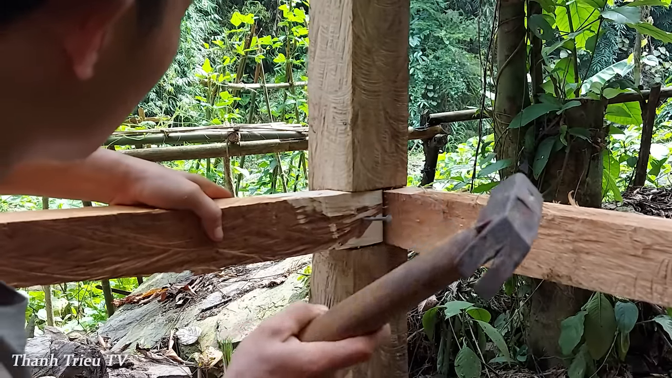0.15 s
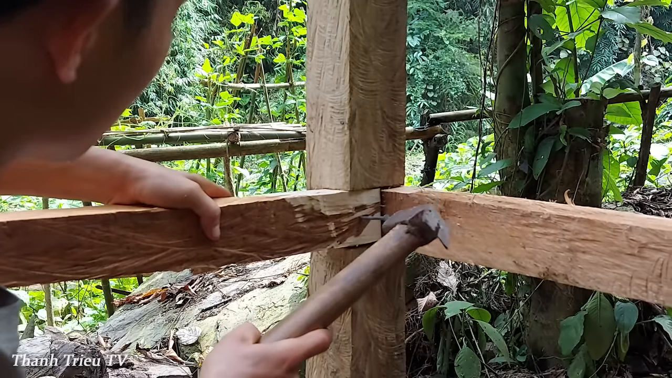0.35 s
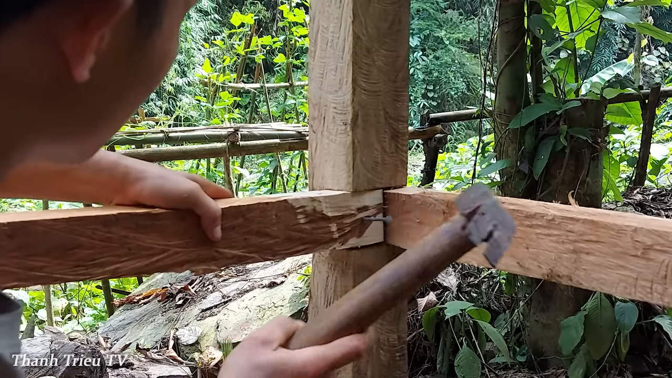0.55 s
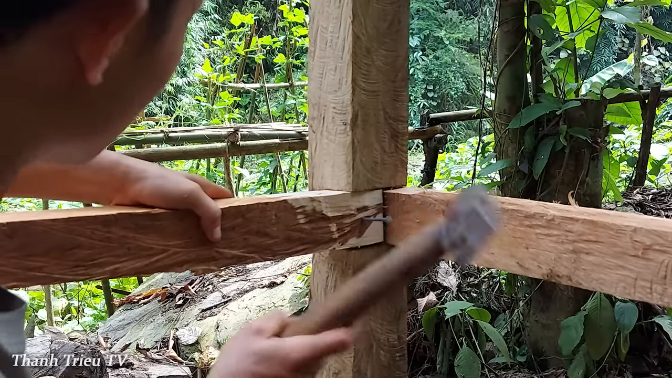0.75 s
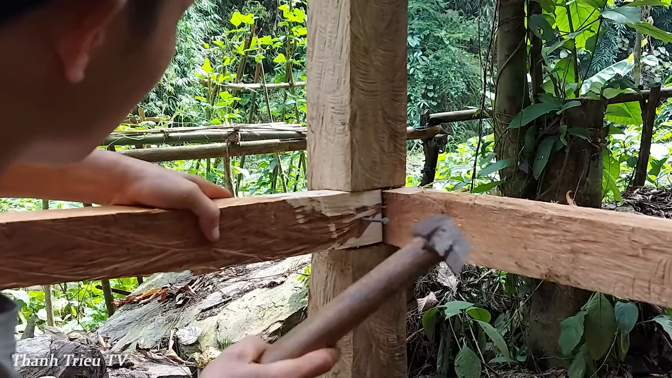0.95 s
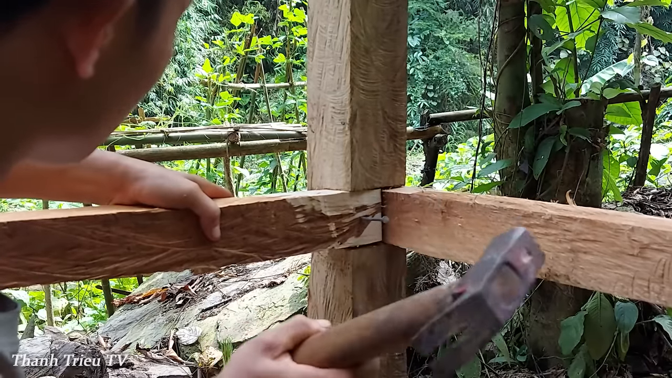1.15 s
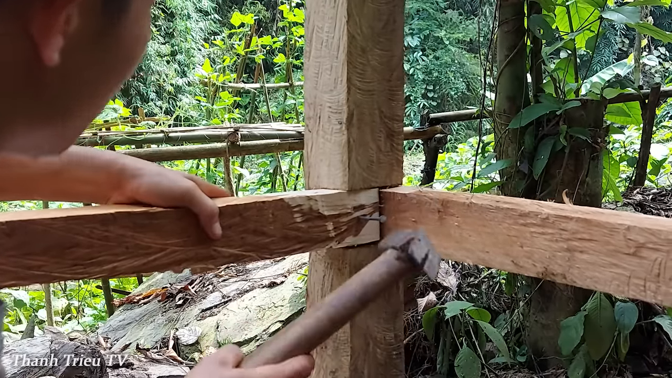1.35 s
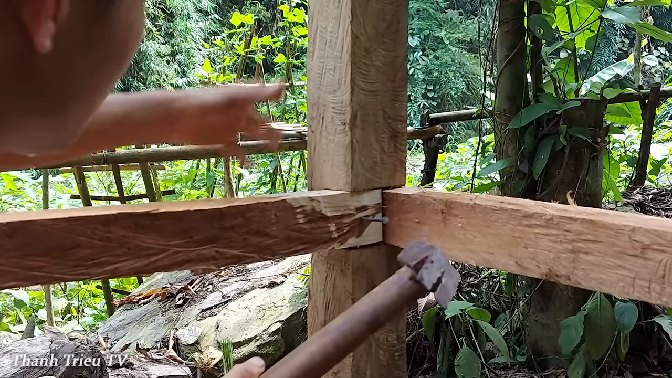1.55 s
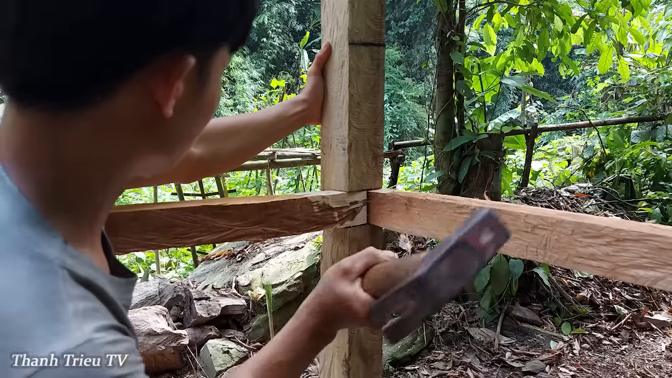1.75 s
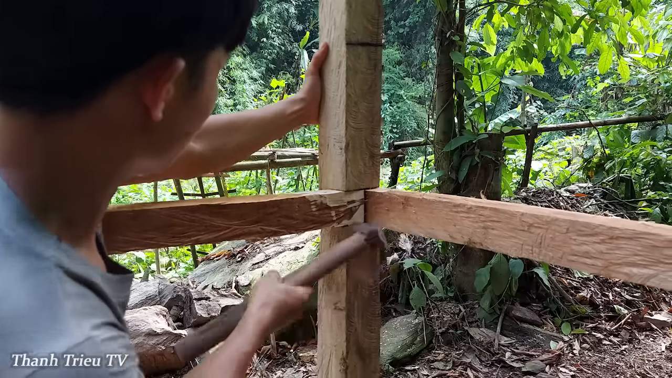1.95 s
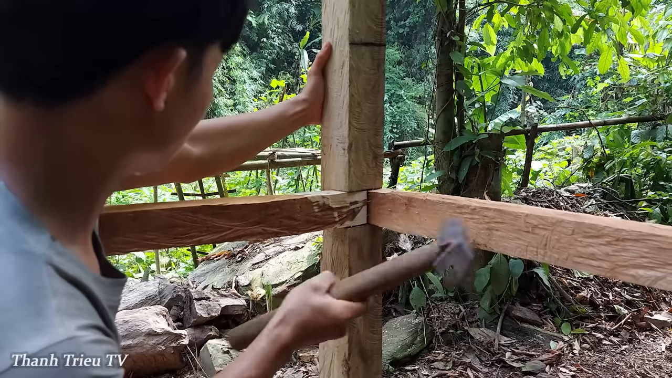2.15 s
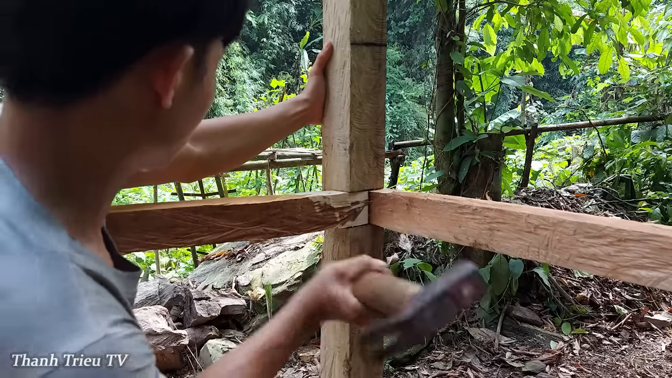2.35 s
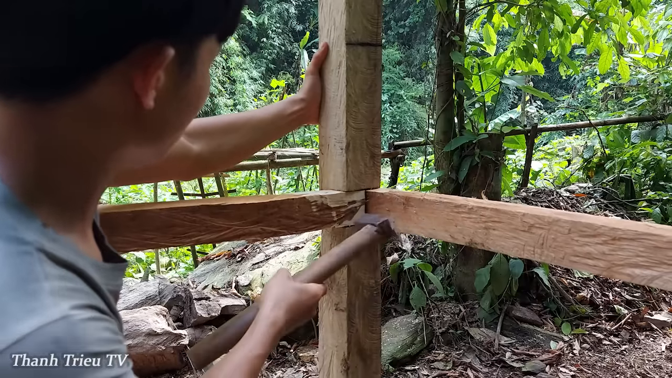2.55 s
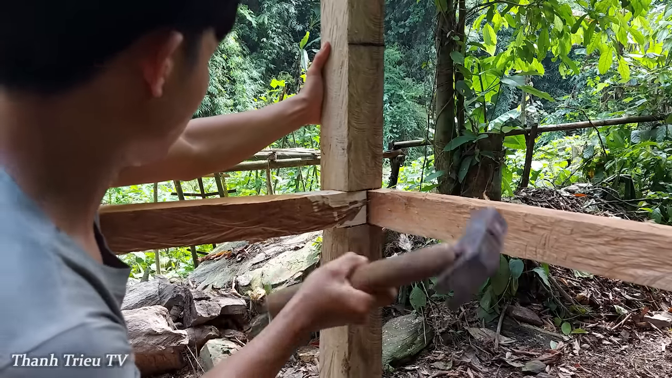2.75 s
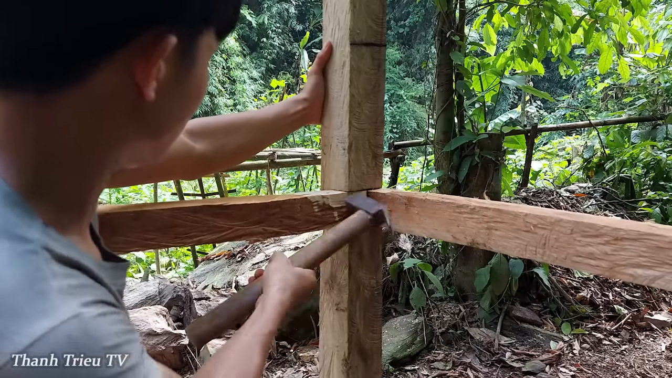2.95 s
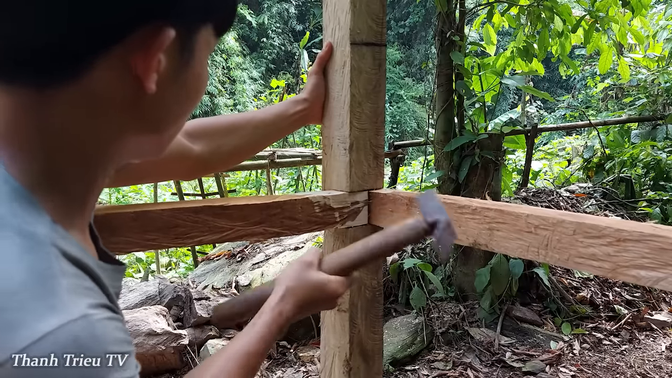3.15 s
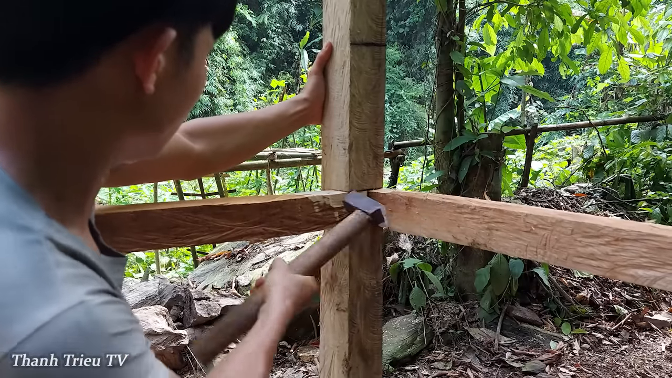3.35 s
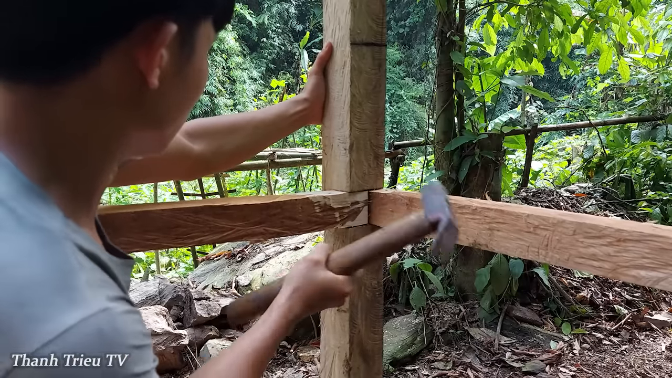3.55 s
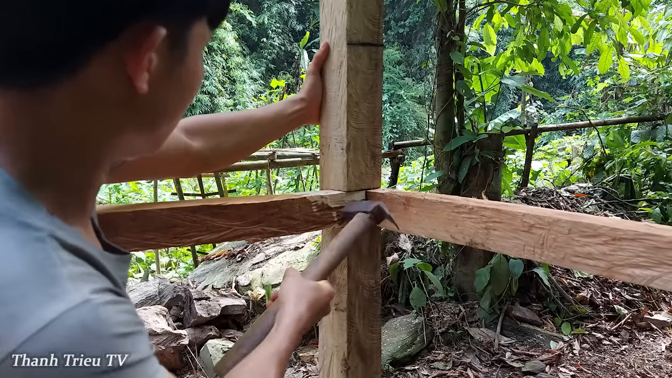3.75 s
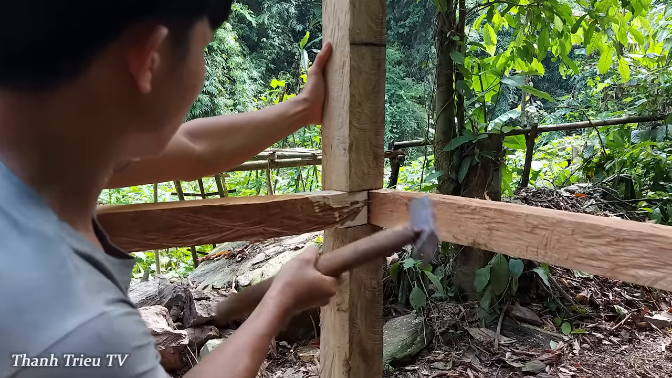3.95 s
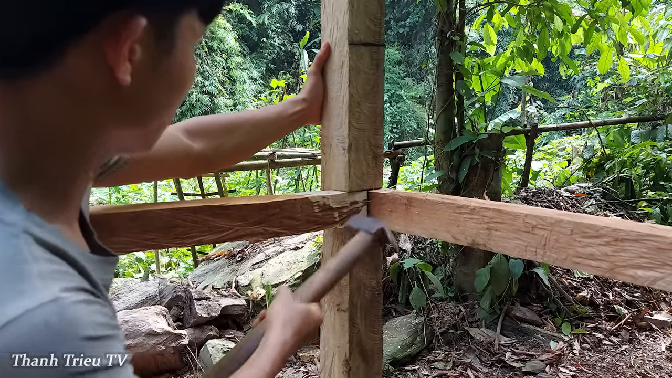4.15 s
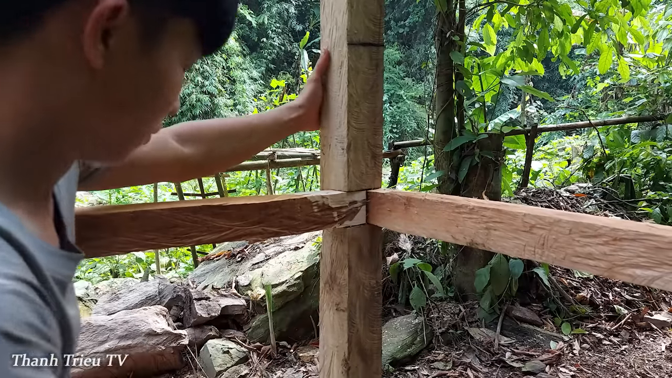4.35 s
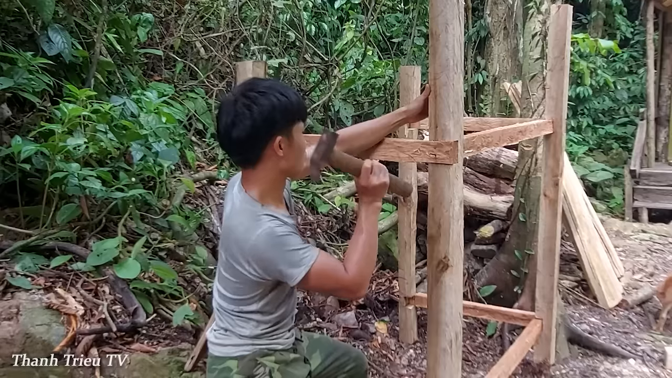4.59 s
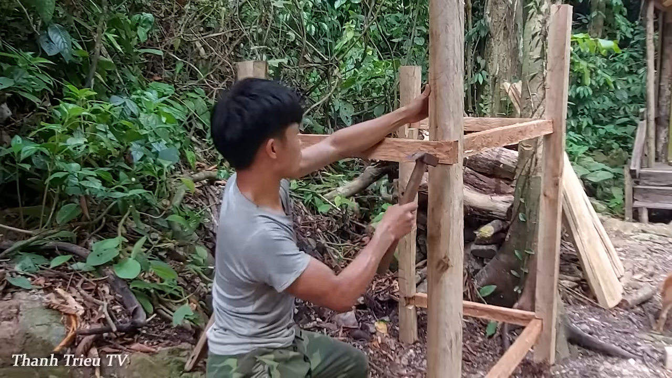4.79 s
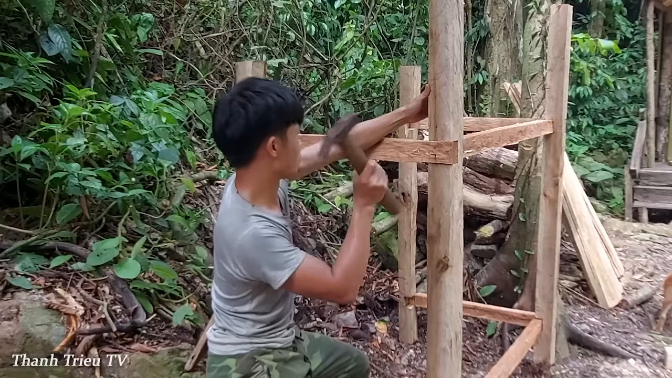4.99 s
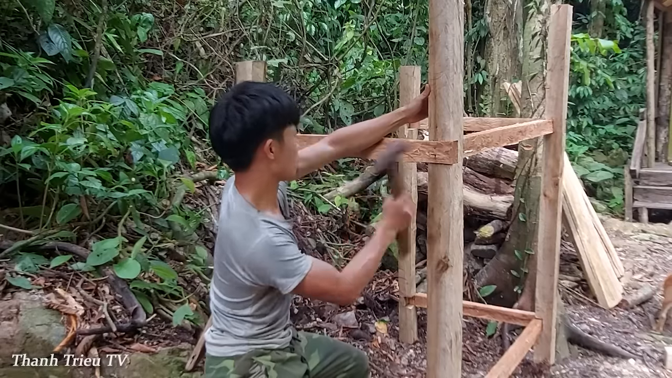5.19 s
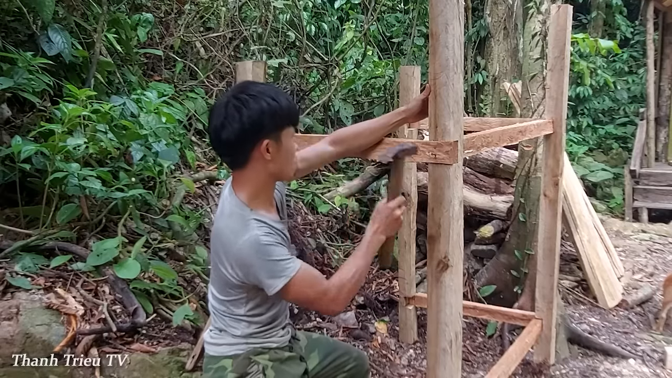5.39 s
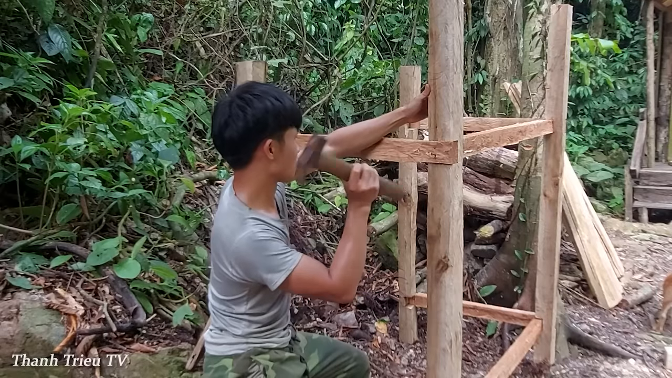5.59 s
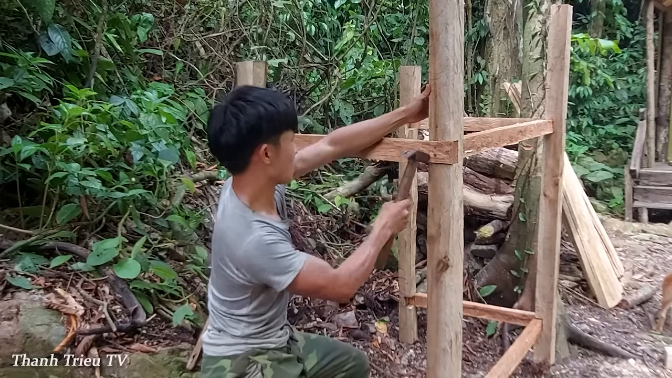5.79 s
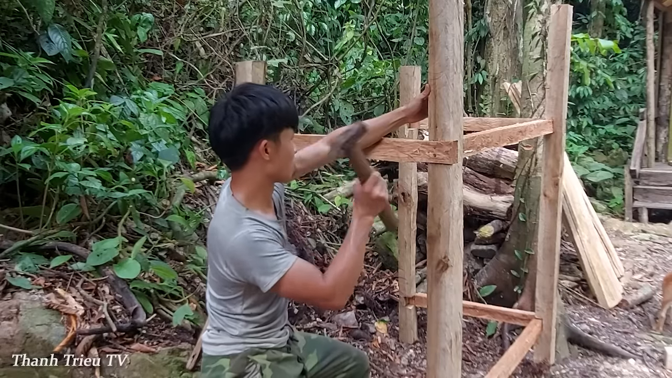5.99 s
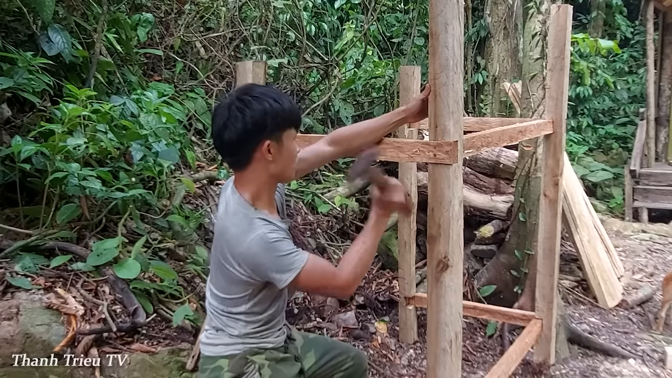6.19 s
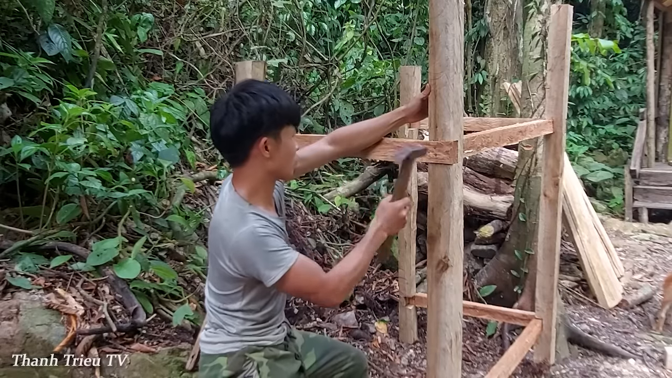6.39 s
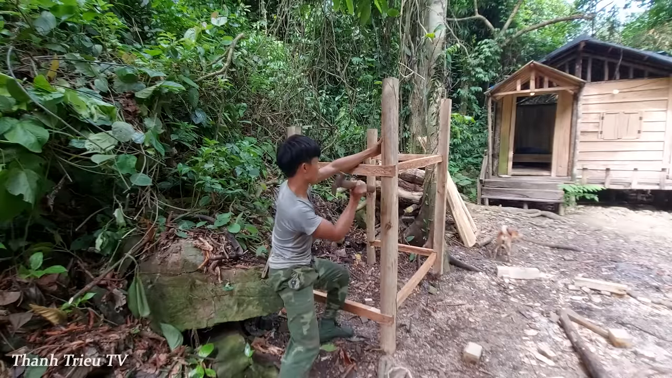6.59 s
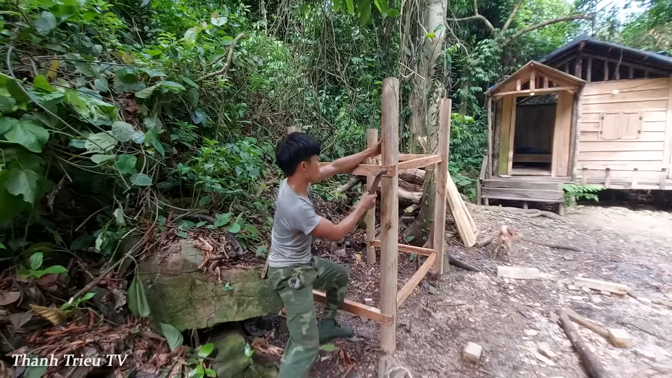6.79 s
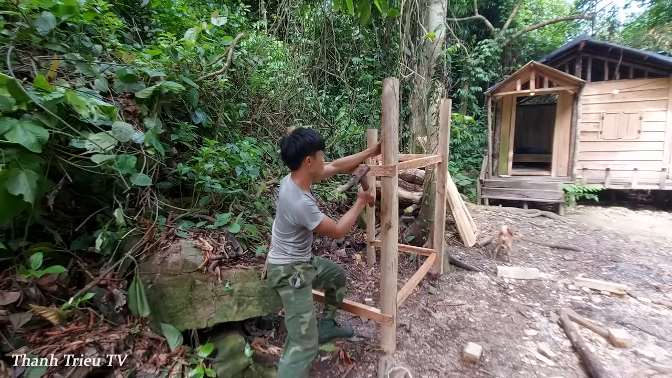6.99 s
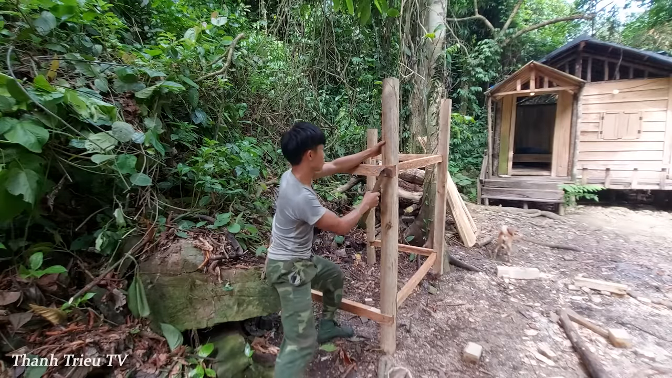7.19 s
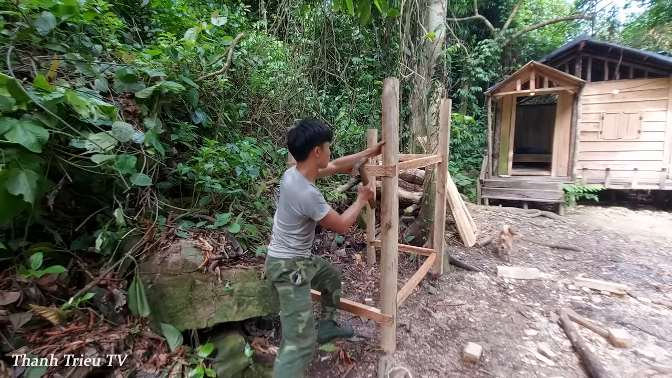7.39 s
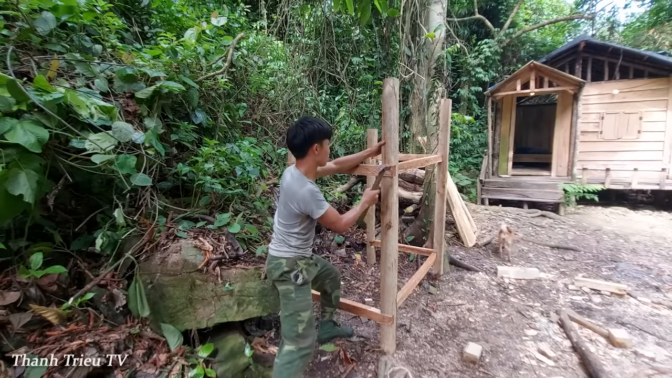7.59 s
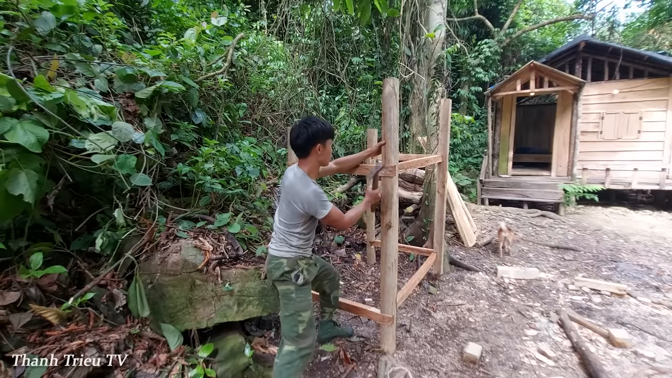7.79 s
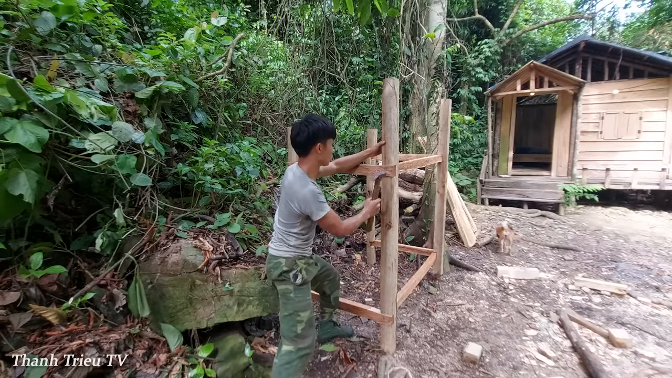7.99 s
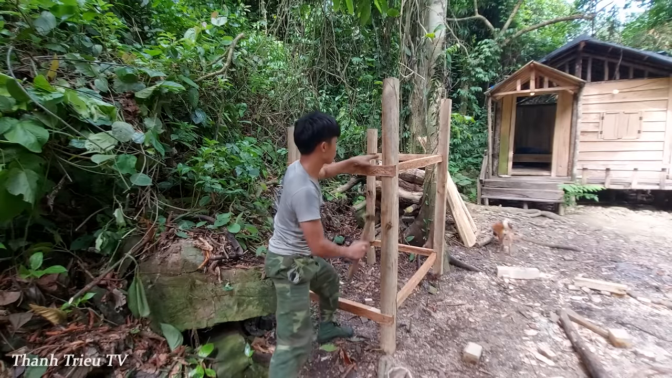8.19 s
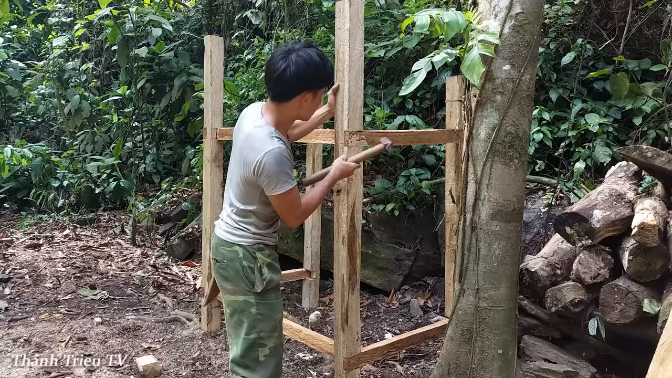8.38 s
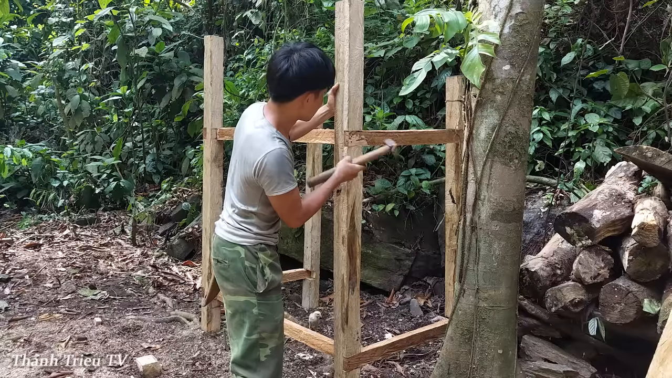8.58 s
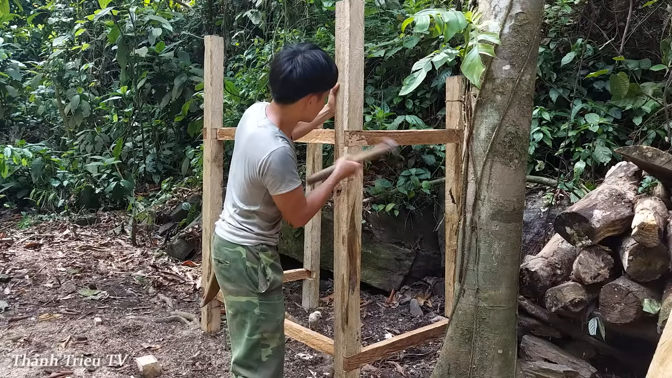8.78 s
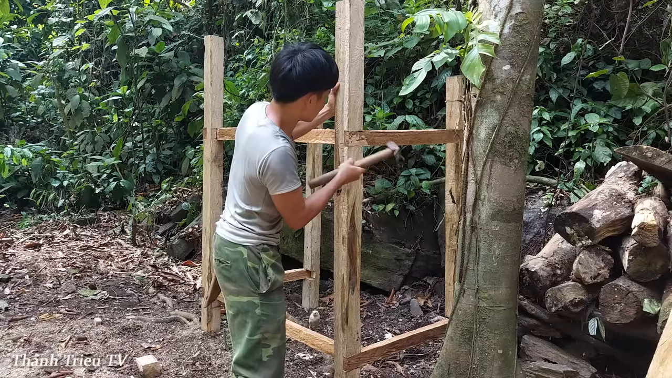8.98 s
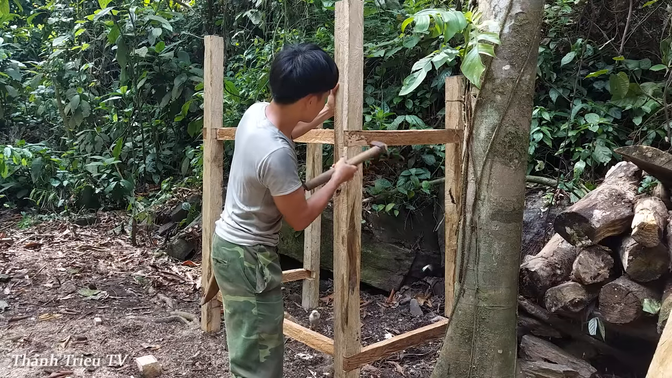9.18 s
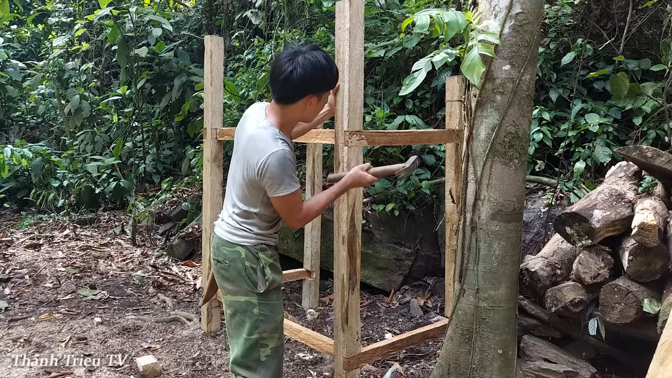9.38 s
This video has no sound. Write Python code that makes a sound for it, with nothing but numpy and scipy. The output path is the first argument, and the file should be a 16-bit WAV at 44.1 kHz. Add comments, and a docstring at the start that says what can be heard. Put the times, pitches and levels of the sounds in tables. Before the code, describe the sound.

About twenty hammer blows on wooden beams, each a sharp contact and short hollow ring that dies quickly, with a soft scattering from trees. The tone jumps whenever the listening spot changes. Some blows puff low air into the nearby microphone. Two dull rebounds, small scuffs and one faint falling bird whistle slip between; quiet leaf hush continues throughout.

```python
"""Hammering a timber frame in a forest

A heavy hammer drives the joints of a timber frame home in a forest clearing, heard from six spots in turn.
Each blow is a noise crack plus damped beam modes, with a far echo and a diffuse wash from the trees.
Some blows push a puff of air into the microphone: a short, deep damped swing. Light scuffs are noise bands.
Filtered noise makes the hush and the insects, a falling sine the bird. The blows overload the recorder.
"""
import sys
import numpy as np
from scipy import signal
from scipy.fft import rfft, irfft, next_fast_len
from scipy.io import wavfile

SR = 44100
rng = np.random.default_rng(int(sys.argv[2]) if len(sys.argv) > 2 else 0)


def inscribe(sig):
    """Save sig as 16-bit PCM at rate SR to the path in sys.argv[1].

    A 1-D sig is mono; a 2-D sig holds one channel per row.
    Samples are clipped to [-1, 1] before scaling.
    """
    pcm = np.round(np.clip(np.atleast_2d(sig).T, -1, 1) * 32767)
    wavfile.write(sys.argv[1], SR, pcm.astype(np.int16))


N = 416304

# Blows; the first fell before time zero and is dying away:
# (time [s], force [dB], hardness of the contact as treble gain [dB])
BLOWS = [(-.1, 26, 9), (0.3891, 28, 8.5), (.874, 31, 5), (1.341, 32.5, 1.5), (1.955, 26, -1),
         (2.5021, 28, -4), (2.9983, 37.5, -3), (3.3933, 37, -13.5), (3.7434, 34, -0.5), (4.064, 37, -6.5),
         (4.7124, 30, 0.5), (5.2241, 30.5, -1), (5.745, 27, 5.5), (6.2776, 35, 8), (6.7346, 38, 0.5),
         (7.133, 35, 2.5), (7.4976, 36, -2), (7.8344, 36, -1.5), (8.5, 26, -10), (8.8617, 30, 3.5),
         (9.1803, 31, -7.5)]
# The head drops back on the wood, dull, the first nearly as strong as its blow: (time [s], force [dB])
REBOUNDS = [(4.752, 28.5), (8.905, 19)]
# Listening spots: (start [s], ring length [factor], crack [dB], clear modes [dB], echo [dB], bass [dB],
# bite [dB], forest wash [dB], left-right difference [dB])
SPOTS = [(0, 1.26, 3.5, 0, -30.5, -1.5, 3.5, -20.5, 2.5), (1.68, 1.28, 7.5, 1, -25.5, -7.5, 6.5, -14.5, 1),
         (2.8, 0.92, 5.5, -2, -21.5, -6, 1.5, -12.5, 3), (4.57, 1.21, -4, -0.5, -28, -2.5, 1.9, -14.7, 1),
         (6.2, 0.95, -5, -2.5, -38, 0, -0.2, -14.5, .5), (8.33, 0.94, -5, -0.5, -51, 1, 6.5, -14.5, -.5)]
# Clear modes of the struck joint at each spot, timber below and steel hammer head on top:
# (frequency [Hz], relative level [dB], t60 before stretching [s])
JOINT_MODES_1 = [(160, -5.7, 0.198), (241, -2.9, 0.18), (313, 1.9, 0.136), (386, 4.8, 0.111),
                 (467, 0.4, 0.104), (583, 5.2, 0.18), (637, 6.8, 0.098), (704, 2.0, 0.116),
                 (896, 4.5, 0.093), (1017, 4.8, 0.163), (1115, 2.0, 0.117), (1392, 7.0, 0.102),
                 (1773, 4.3, 0.093), (2191, -2.0, 0.123), (6639, -14.6, 0.112), (9728, -6.0, 0.15),
                 (10065, -7.8, 0.18), (10739, -0.6, 0.15)]
JOINT_MODES_2 = [(263, 7.0, 0.18), (511, 4.5, 0.18), (721, 5.7, 0.162), (753, 4.9, 0.18), (963, 3.2, 0.172),
                 (1146, 3.2, 0.176), (1336, 3.6, 0.119), (1668, 2.3, 0.143), (2444, -0.8, 0.175),
                 (3266, -0.2, 0.144), (4021, -0.3, 0.144), (9149, -1.4, 0.165), (9761, 5.3, 0.15)]
JOINT_MODES_3 = [(267, -2.1, 0.18), (532, -1.8, 0.176), (725, 1.4, 0.18), (832, 2.2, 0.123),
                 (960, 5.0, 0.159), (1138, 4.2, 0.117), (1206, -0.0, 0.165), (1341, 2.4, 0.113),
                 (1435, 3.4, 0.119), (1537, 0.3, 0.14), (1866, 2.2, 0.18), (2075, -2.4, 0.155),
                 (2444, -2.7, 0.18), (2830, -5.8, 0.146), (3266, -7.5, 0.148), (9761, -8.9, 0.18)]
JOINT_MODES_4 = [(138, 7.7, 0.38), (706, 1.8, 0.18), (782, 3.7, 0.18), (1042, 3.9, 0.18), (1123, 1.5, 0.18),
                 (1480, 7.9, 0.18), (1696, 4.0, 0.141), (1822, 3.0, 0.172), (1971, 1.8, 0.18),
                 (2362, -0.4, 0.18), (5019, -2.0, 0.155), (8842, -0.5, 0.137), (9180, 2.8, 0.154),
                 (9795, 3.2, 0.134), (11776, -0.8, 0.18)]
JOINT_MODES_5 = [(136, 3.7, 0.45), (273, -4.6, 0.18), (461, -2.5, 0.18), (585, -0.4, 0.144),
                 (687, 3.6, 0.142), (735, 2.5, 0.18), (790, 1.4, 0.165), (927, 4.3, 0.142),
                 (1045, 3.3, 0.113), (1300, 3.6, 0.18), (1480, 2.9, 0.155), (1590, 1.3, 0.125),
                 (1731, 2.2, 0.145), (1931, -2.4, 0.163), (2306, -3.0, 0.14), (4132, -9.8, 0.18),
                 (9795, -11.6, 0.139)]
JOINT_MODES_6 = [(138, 5.3, 0.55), (187, -0.4, 0.4), (305, 5.9, 0.12), (332, 6.8, 0.12), (453, 4.7, 0.18),
                 (593, 4.6, 0.18), (685, 0.2, 0.18), (912, 1.4, 0.18), (1206, 6.3, 0.135),
                 (1354, 5.8, 0.139), (1911, 4.3, 0.113), (2039, 0.9, 0.18), (3156, -4.5, 0.142),
                 (3730, -4.7, 0.123), (4818, -5.7, 0.14)]
# The many weaker, close-set modes of each joint, as a spectrum: (frequency [Hz], relative level [dB])
DENSE_MODES_1 = [(50, -10), (100, -5.5), (200, -6.5), (290, 2), (400, 1), (700, 1), (1300, -2), (2000, -4),
                 (3200, -13.5), (5000, -24), (7500, -25.5), (10000, -16.5), (15500, -21.5)]
DENSE_MODES_2 = [(50, 11.5), (100, 4), (200, 2), (290, 17), (400, 6), (700, 3.5), (1300, 2.5), (2000, 2),
                 (3200, -2.5), (5000, -8.5), (7500, -11), (10000, 1.5), (15500, -13)]
DENSE_MODES_3 = [(50, -8), (100, -9), (200, -11.5), (290, 3), (400, -4), (700, -1.2), (1300, 0),
                 (2000, -0.5), (3200, -12), (5000, -19.5), (7500, -25), (10000, -10.5), (15500, -25)]
DENSE_MODES_4 = [(50, -3.5), (100, 1.5), (200, -9), (290, -3), (400, -6.5), (700, -8), (1300, 1),
                 (2000, -1), (3200, -8), (5000, -5.5), (7500, -10), (10000, -3.5), (15500, -12.5)]
DENSE_MODES_5 = [(50, -13), (100, -12), (200, -13), (290, -5.5), (400, -9.5), (700, 0), (1300, 1.5),
                 (2000, -2.5), (3200, -11), (5000, -16), (7500, -23), (10000, -15.5), (15500, -24.5)]
DENSE_MODES_6 = [(50, -10), (100, -7.5), (200, -17), (290, 5), (400, -1), (700, -1), (1300, 5), (2000, 1.1),
                 (3200, -5.5), (5000, -11), (7500, -12.5), (10000, -10), (15500, -18.5)]
# The joint at each spot: (clear modes, dense modes)
JOINTS = [(JOINT_MODES_1, DENSE_MODES_1), (JOINT_MODES_2, DENSE_MODES_2), (JOINT_MODES_3, DENSE_MODES_3),
          (JOINT_MODES_4, DENSE_MODES_4), (JOINT_MODES_5, DENSE_MODES_5), (JOINT_MODES_6, DENSE_MODES_6)]
# Decay of the dense ring: (frequency [Hz], t60 before the spot and damping factors [s])
RING_T60 = [(60, 0.39), (300, 0.14), (1200, 0.063), (4000, 0.094), (11000, 0.18)]
# First contact relative to the ring: (frequency [Hz], level before the spot's crack gain [dB])
CRACK_COLOUR = [(150, -15), (700, -14.5), (2000, -1), (11000, 4.5)]
# Decay of the sound scattered by the forest: (frequency [Hz], t60 [s])
FOREST_T60 = [(100, 0.44), (400, 0.89), (1300, 0.8), (3000, 0.54), (6000, 0.59), (13000, 0.59)]
# Colour of the scattered sound: (frequency [Hz], relative level [dB])
FOREST_COLOUR = [(60, 1), (300, -3), (1200, -0.5), (4000, 5), (11000, 0)]
# Left-right correlation of the near, direct sound: (frequency [Hz], correlation [-1 to 1])
NEAR_CORRELATION = [(100, 0.99), (380, 0.95), (700, 0.45), (1300, 0.25), (4000, 0.29), (9000, 0.043)]
# Left-right correlation of the diffuse, far sound: (frequency [Hz], correlation [-1 to 1])
FAR_CORRELATION = [(100, 0.81), (290, 0.76), (640, 0.28), (1400, -0.26), (3000, 0.12), (9000, -0.079)]
# Puffs of air from the swing: (time [s], left level [dB], right level [dB])
PUFFS = [(1.957, -9.5, -1), (2.503, -18, 9), (2.997, -34, -26), (3.746, -16, -10), (4.066, -8.5, -23),
         (5.227, 5.5, -28)]
# Handling of wood and tool: (time [s], level [dB], centre [Hz], width [octaves], t60 [s])
SCUFFS = [(6.104, -37.5, 3400, 0.23, 0.063), (6.151, -31.5, 1320, 0.87, 0.069),
          (6.149, -36.5, 9000, .8, 0.1), (8.346, -37.5, 1200, 1.43, 0.63), (9.403, -40, 11000, .4, 0.07)]
# Forest air by place: (start [s], hush level [dB], treble tilt [dB], insect centre [Hz],
# insect level [dB], insect band width [octaves])
AIR = [(0, -47.5, -5, 8330, -65, .045), (1.68, -50.5, -6, 7720, -72.5, .055),
       (4.573, -46.5, -4.5, 7560, -60, 0.058), (8.33, -44, -5, 7700, -60, 0.092)]
# Spectrum of the hush before levelling: (frequency [Hz], relative level [dB])
HUSH_COLOUR = [(18, -74), (30, -36), (75, -10), (194, -8), (266, -10), (303, -4), (600, -5), (913, -5.5),
               (988, -8.5), (1390, -6), (2290, -7.5), (11700, -14), (16000, -20)]
# Centres of the bands that decay separately: (frequency [Hz])
BANDS_HZ = [60, 150, 350, 800, 1700, 3500, 7000, 14000]

# Contact and trees, all in dB per dB: a harder blow has more knock and bite, a stronger one more bite,
# and a harder one carries better into the trees
KNOCK_PER_HARDNESS, WASH_PER_HARDNESS = 0.12, 0.19
BITE_PER_HARDNESS, BITE_PER_FORCE = 0.47, 0.6
USUAL_FORCE_DB = 35
SUB_BASS_DB = -18  # relative to the bass: the beams radiate little of the lowest bass
CRACK_T60_S, CRACK_RISE_S = 0.014, 0.0003
ECHO_S = 0.132
# the resting head shortens the ring (a factor) and hardly changes the bass
REBOUND_HARDNESS_DB, REBOUND_RING, REBOUND_BASS_DB = -32, 0.63, -0.5
BIRD_AT_S, BIRD_LENGTH_S = 2.862, 0.098
BIRD_START_HZ, BIRD_START_DB = 3590, -59
BIRD_SAG_HZ_PER_S, BIRD_FADE_DB_PER_S = 4200, 70
EDGE_HZ = 16000  # low-pass edge of the finished sound


def gain_of(db):
    """Level to amplitude ratio: 20 dB is a factor of ten."""
    return 10 ** (np.asarray(db) / 20)


def evened(x):
    """Power normalisation: scales to rms 1."""
    return x / np.sqrt(np.mean(x ** 2) + 1e-20)


def read(points, hz):
    """Logarithmic pitch scale: joins (Hz, value) points by straight lines over log frequency."""
    f, value = np.transpose(points)
    return np.interp(np.log(hz + 1), np.log(f + 1), value)


def add(mix, s, sound):
    """Superposition: adds a stereo sound at time s, which may lie before time zero."""
    start = round(s * SR)
    sound = sound[:, max(-start, 0):]
    part = mix[:, max(start, 0):][:, :sound.shape[1]]
    part += sound[:, :part.shape[1]]


def bins(x):
    """Discrete Fourier analysis: the frequencies of the spectrum of x."""
    return np.fft.rfftfreq(x.shape[-1], 1 / SR)


def coloured(x, db):
    """Minimum-phase filtering: a causal filter with the given gain per bin keeps attacks sharp."""
    size = x.shape[-1]
    cepstrum = irfft(np.log(gain_of(np.maximum(db, -100))), size)
    # folding the cepstrum onto positive time makes the filter causal
    cepstrum[1:size // 2] *= 2
    cepstrum[size // 2 + 1:] = 0
    return irfft(rfft(x) * np.exp(rfft(cepstrum)), size)


def noise_pair(size, correlation):
    """Spatial correlation: white noise at two microphone ports, sharing a part set by frequency."""
    left, other = rng.standard_normal((2, size))
    same = np.clip(read(correlation, bins(left)), -1, 1)
    right_spectrum = same * rfft(left) + np.sqrt(1 - same ** 2) * rfft(other)
    return np.array([left, irfft(right_spectrum, size)])


def noise_band(size, hz, octaves):
    """Band-limited noise: a bell-shaped band on an octave axis, rms 1."""
    x = noise_pair(size, FAR_CORRELATION)
    distance = np.log2((bins(x) + 1) / hz) / octaves
    return evened(irfft(rfft(x) * np.exp(-distance ** 2), size))


def fade(size, t60, rise=0.0012):
    """Exponential damping: a quick rise and a fall of 60 dB per t60, energy 1."""
    t = np.arange(size) / SR
    shape = gain_of(-60 * t / t60) * (1 - np.exp(-t / rise))
    return shape / np.linalg.norm(shape)


def dying(x, t60s, rise):
    """Frequency-dependent damping: each band of a noise dies at its own speed."""
    size, spectrum = x.shape[-1], rfft(x)
    out = np.zeros_like(x)
    for one_band, t60 in zip(np.eye(len(BANDS_HZ)), t60s):
        share = read(list(zip(BANDS_HZ, one_band)), bins(x))
        out += irfft(spectrum * share, size) * fade(size, t60, rise)
    return out


def hammering():
    """Impact excitation: gives each blow and rebound to the joint of its spot."""
    free = [(s, db, hardness_db, 1, 0) for s, db, hardness_db in BLOWS]
    damped = [(s, db, REBOUND_HARDNESS_DB, REBOUND_RING, REBOUND_BASS_DB) for s, db in REBOUNDS]
    hits = np.array(free + damped)
    where = np.searchsorted([spot[0] for spot in SPOTS[1:]], hits[:, 0])
    return sum(joint(hits[where == k], spot, *JOINTS[k]) for k, spot in enumerate(SPOTS))


def joint(hits, spot, modes, dense_modes, fresh=0.31, dense_db=-1.0, tail_modes_db=-4, echo_hz=560):
    """Modal superposition and scattering: crack, ringing beams, a far echo and a wash from the trees."""
    _, length, crack_db, modes_db, echo_db, bass_db, bite_db, wash_db, pan_db = spot
    out, bands = np.zeros((2, N)), np.array(BANDS_HZ)
    grain = noise_pair(SR, NEAR_CORRELATION)  # the same timber answers every blow
    hz = bins(grain)
    dense_colour_db = read(dense_modes, hz)
    # the phase between the ports follows from their correlation
    apart = np.arccos(np.clip(read(NEAR_CORRELATION, np.array(modes)[:, 0]), -1, 1))
    phases = rng.uniform(0, 2 * np.pi, (len(modes), 1)) + np.outer(apart, [1, 0])
    crack_gain_db = read(CRACK_COLOUR, hz) + crack_db
    share_db = -10 * np.log10(1 + gain_of(crack_gain_db) ** 2)  # crack and ring share the energy
    echo_band = signal.butter(2, [echo_hz / 2, echo_hz * np.sqrt(2)], "band", fs=SR, output="sos")
    pan = gain_of([[pan_db / 2], [-pan_db / 2]])
    for s, force_db, hardness_db, damping, rebound_bass_db in hits:
        texture = np.sqrt(1 - fresh) * grain + np.sqrt(fresh) * noise_pair(SR, NEAR_CORRELATION)
        ring = dying(texture, damping * length * read(RING_T60, bands), rise=0.00078)
        burst = noise_pair(SR, NEAR_CORRELATION) * fade(SR, CRACK_T60_S, rise=CRACK_RISE_S)
        crack = coloured(burst, crack_gain_db)
        clear = gain_of(modes_db) * ringing(modes, phases, stretch=0.91 * damping)
        knock = clear + coloured(ring + crack, dense_colour_db + share_db + dense_db)
        # trunks and leaves scatter the knock: a diffuse wash in which the clear modes linger
        tail_db = wash_db + WASH_PER_HARDNESS * hardness_db
        scattered = dying(noise_pair(SR, FAR_CORRELATION), read(FOREST_T60, bands), rise=0.005)
        trees = coloured(scattered, read(FOREST_COLOUR, hz) + tail_db)
        lingering = signal.fftconvolve(clear, trees, axes=1)[:, :SR]
        wash = coloured(trees, dense_colour_db) + gain_of(tail_modes_db) * lingering
        sound = knock * pan + wash
        add(sound, ECHO_S, gain_of(echo_db) * signal.sosfilt(echo_band, knock))
        colour = contact(force_db, hardness_db, bass_db + rebound_bass_db, bite_db)
        add(out, s, coloured(sound, force_db + read(colour, hz)))
    return out


def contact(force_db, hardness_db, bass_db, bite_db):
    """Contact stiffness: a square, hard blow is bright, a glancing one dull; returns (Hz, dB) points."""
    knock_db = KNOCK_PER_HARDNESS * hardness_db
    force_bite_db = BITE_PER_FORCE * (force_db - USUAL_FORCE_DB)
    total_bite_db = bite_db + BITE_PER_HARDNESS * hardness_db + force_bite_db
    return [(25, bass_db + SUB_BASS_DB), (70, bass_db), (330, bass_db), (800, 0),
            (1800, knock_db), (4500, total_bite_db), (11000, hardness_db)]


def ringing(modes, phases, stretch, detune=0.00072, vary_db=3.5):
    """Modal synthesis: damped sines; each blow lands a little differently and shifts them."""
    t, out = np.arange(SR // 2) / SR, np.zeros((2, SR))
    for (hz, db, t60), phase in zip(modes, phases):
        shift, strength = rng.standard_normal(2)
        shape = gain_of(-60 * t / (t60 * stretch))
        wave = np.sin(2 * np.pi * hz * (1 + detune * shift) * t + phase[:, None])
        # dividing by the sum makes the level that of the spectral peak
        out[:, :len(t)] += 2 * gain_of(db + vary_db * strength) * wave * shape / shape.sum()
    return out


def puffs(hz=57, t60=0.053, lag=0.31, soft_hz=450):
    """Damped oscillation: air pushed by the hammer jolts a port into a short deep swing."""
    out, t = np.zeros((2, N)), np.arange(SR // 4) / SR
    swing = np.cos(2 * np.pi * hz * t + lag) * gain_of(-60 * t / t60)
    swing = signal.sosfilt(signal.butter(2, soft_hz, fs=SR, output="sos"), swing)
    for s, left_db, right_db in PUFFS:
        add(out, s, gain_of([[left_db], [right_db]]) * swing)
    return out


def scuffs():
    """Friction noise: ticks and scrapes between the blows are decaying bands of noise."""
    out = np.zeros((2, N))
    for s, db, hz, octaves, t60 in SCUFFS:
        shape = fade(SR // 2, t60, rise=0.00082)
        add(out, s, gain_of(db) * noise_band(SR // 2, hz, octaves) * shape / shape.max())
    return out


def bird():
    """Frequency glide: one faint sine whistle falls and fades at a steady rate."""
    t, out = np.arange(0, BIRD_LENGTH_S, 1 / SR), np.zeros((2, N))
    turns = np.cumsum(BIRD_START_HZ - BIRD_SAG_HZ_PER_S * t) / SR
    whistle = gain_of(BIRD_START_DB - BIRD_FADE_DB_PER_S * t) * np.sin(2 * np.pi * turns)
    add(out, BIRD_AT_S, np.array([whistle, whistle]))
    return out


def forest_air(waver_db=2.0):
    """Diffuse noise field: a soft hush of leaves and a thin band of insects, differing by place."""
    out = np.zeros((2, N))
    starts = [0] + [round(row[0] * SR) for row in AIR[1:]] + [N]
    for place, a, b in zip(AIR, starts, starts[1:]):
        _, hush_db, tilt_db, insect_hz, insect_db, width = place
        size = 2 * next_fast_len((b - a) // 2 + 1)
        x = noise_pair(size, FAR_CORRELATION)
        tilt = read([(800, 0), (6000, tilt_db)], bins(x))
        hush = evened(coloured(x, read(HUSH_COLOUR, bins(x)) + tilt))
        insects = noise_band(size, insect_hz, width)
        air = gain_of(hush_db) * hush + gain_of(insect_db) * insects
        out[:, a:b] = air[:, :b - a]
    # the level wavers between random values eight times a second
    knots = np.arange(0, N, SR // 8)
    waver = np.interp(np.arange(N), knots, rng.standard_normal(len(knots)))
    return out * gain_of(waver_db * waver)


def scene():
    """Superposition at the microphone: the sum of all sources."""
    return hammering() + puffs() + scuffs() + bird() + forest_air()


def record(dry, ceiling=0.99, knee=8):
    """Saturation and band limiting: peaks bend under a ceiling, then a low-pass cuts the top."""
    clipped = dry / (1 + abs(dry / ceiling) ** knee) ** (1 / knee)
    low_pass = signal.firwin(511, EDGE_HZ, window=("kaiser", 7), fs=SR)
    return signal.oaconvolve(clipped, low_pass[None], "same")


dry = scene()
out = record(dry)
inscribe(out)
```